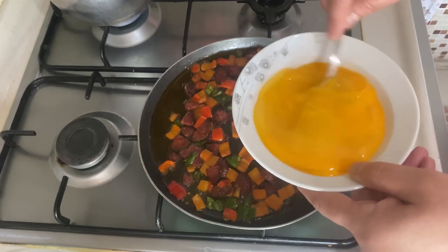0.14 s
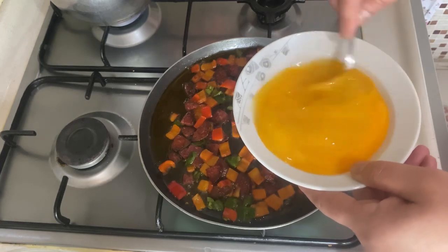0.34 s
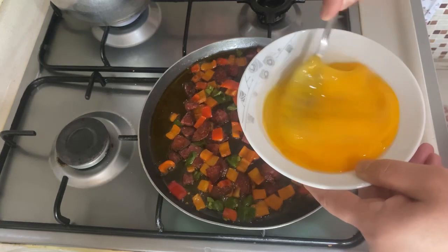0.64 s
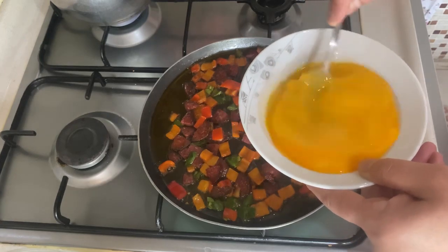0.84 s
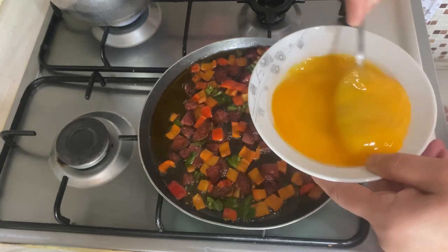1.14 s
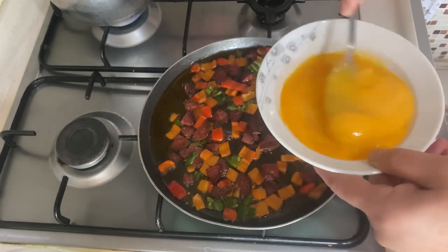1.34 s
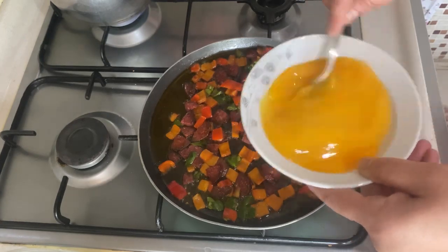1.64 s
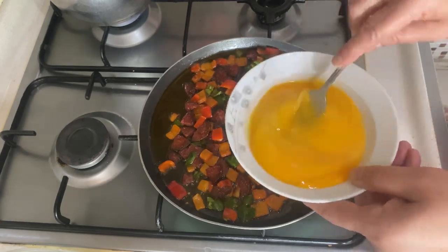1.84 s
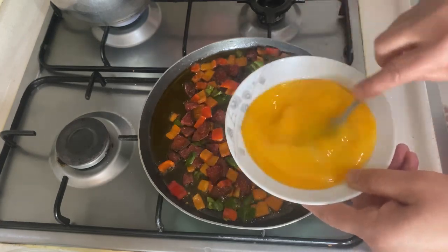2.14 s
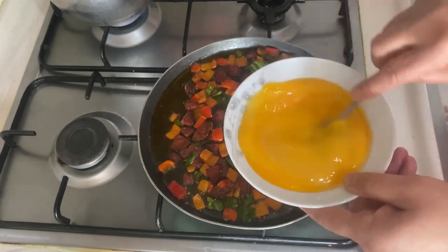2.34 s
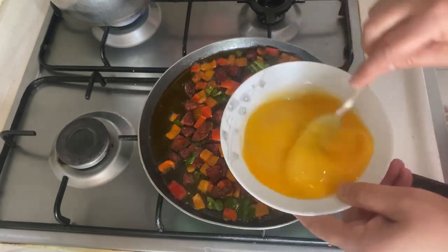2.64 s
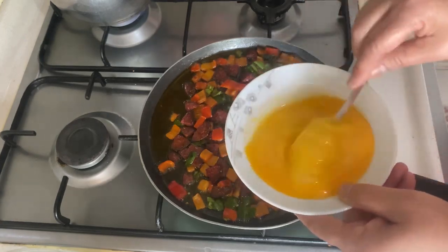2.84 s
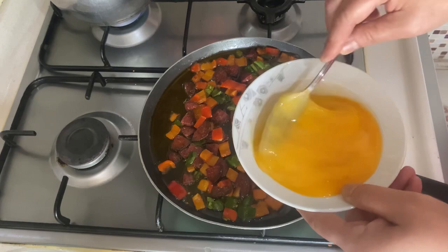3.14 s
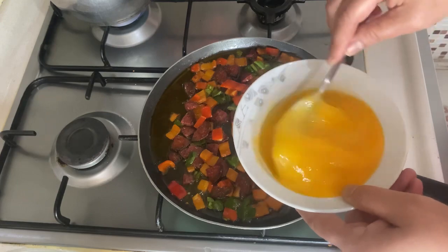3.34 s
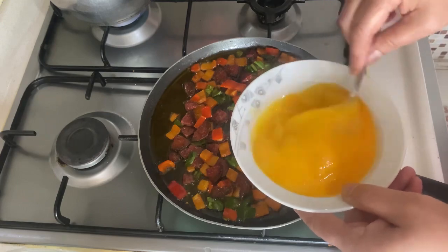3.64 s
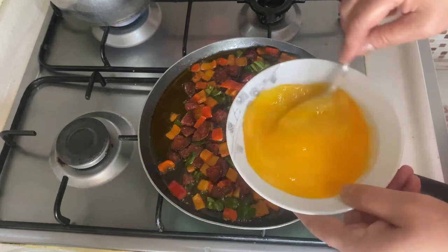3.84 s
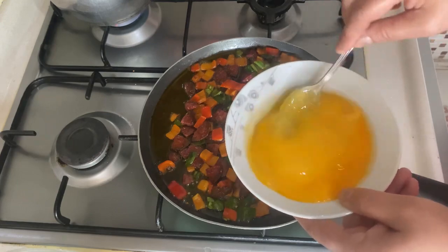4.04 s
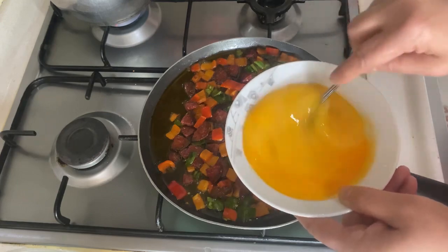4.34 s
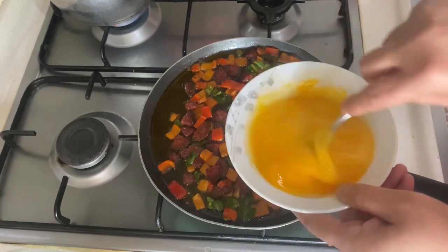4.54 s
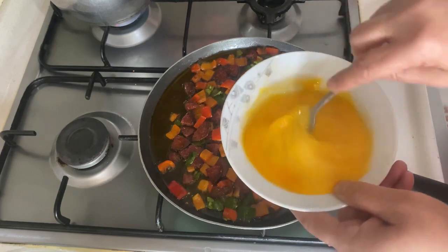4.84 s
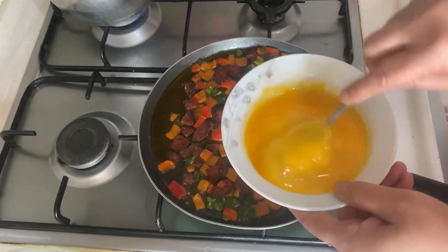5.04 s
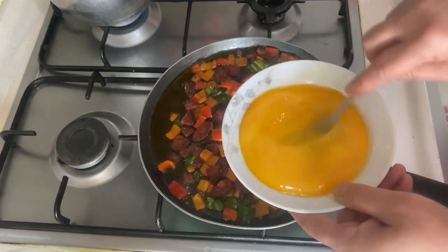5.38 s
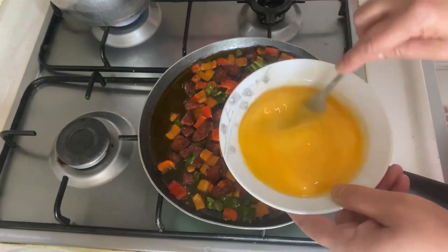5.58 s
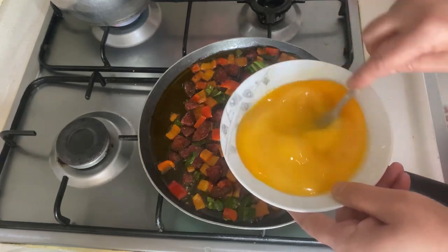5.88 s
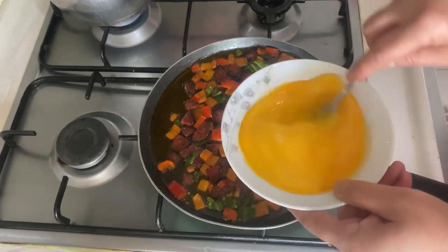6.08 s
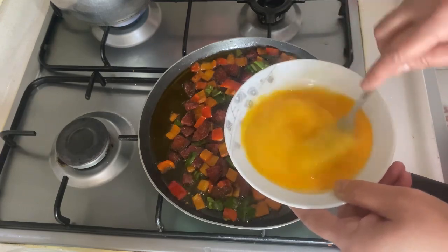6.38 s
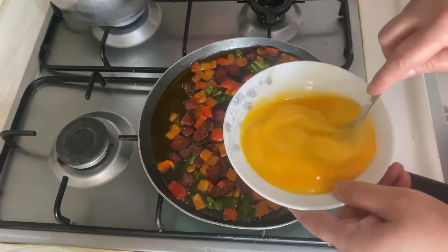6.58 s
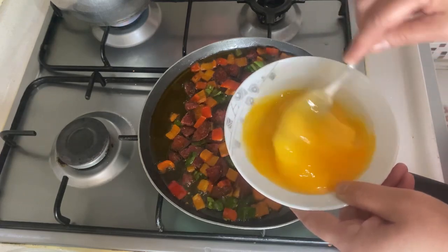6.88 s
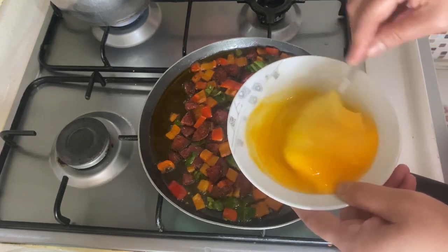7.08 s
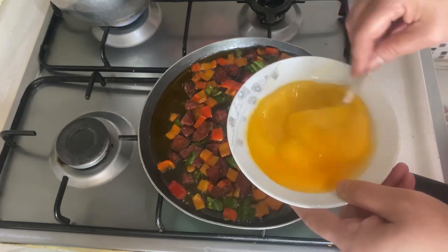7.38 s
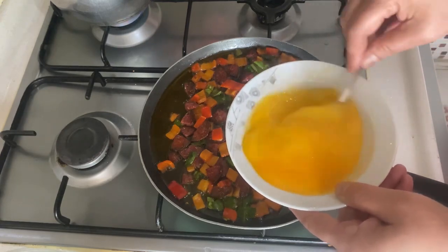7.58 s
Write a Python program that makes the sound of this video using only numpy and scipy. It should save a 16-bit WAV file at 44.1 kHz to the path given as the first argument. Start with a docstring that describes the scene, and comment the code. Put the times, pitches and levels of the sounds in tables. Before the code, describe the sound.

Quick metallic fork taps on a ceramic bowl whisk liquid egg, about five a second, above faint gas hiss and distant motor hum.

```python
"""Beating eggs by the hob

A small kitchen, taken in stereo: a fork beats eggs in a hand-held ceramic bowl over a gas hob.
Noisy contact forces ring resonances of bowl, tines and fork; gliding tones make air pockets plop,
and tiny resonant pops make froth. Tiles and hob answer with a short diffuse reverberation.
Behind lie a distant motor and drones (sines), low rumble and hob hiss (filtered noise)."""
import sys
import numpy as np
from scipy import signal
from scipy.fft import rfft, irfft
from scipy.io import wavfile

SR = 44100
rng = np.random.default_rng(int(sys.argv[2]) if len(sys.argv) > 2 else 0)


def log_audio(samples):
    """Write samples as a 16-bit WAV file to the path given in sys.argv[1]."""
    # one column per channel
    frames = np.atleast_2d(samples).T
    # limit to full scale, then quantise
    limited = np.clip(frames, -1, 1)
    pcm = np.round(limited * 32767).astype(np.int16)
    wavfile.write(sys.argv[1], SR, pcm)


N = 340260
TIME = np.arange(N) / SR

# Tine contacts on the bowl: t/s, tick level/dB, tick f/Hz, tine f/Hz,
# tine ring level/dB, fork overtone level/dB, bowl knock level/dB
CONTACTS = [(0.167, -40, 12700, 4480, -50, -54, -59), (0.298, -47, 12000, 4090, -56, -60, -58),
            (0.311, -57.5, 11800, 4250, -43, -65, -64.5), (0.3324, -42.5, 12800, 4150, -40, -45, -63),
            (0.366, -45.5, 12600, 4430, -53, -53, -65), (0.509, -52, 10700, 3780, -52, -55, -61),
            (0.527, -50, 11700, 4840, -50, -57, -71), (0.698, -32, 9300, 4560, -37.5, -39, -56.5),
            (0.8754, -33.5, 13600, 4480, -42.5, -42, -57), (1.056, -30, 13000, 4530, -41, -41, -53),
            (1.2462, -36.5, 10050, 4380, -52, -43, -59), (1.428, -31, 13400, 4510, -37.5, -38, -55),
            (1.636, -31.5, 13800, 4100, -42.5, -39, -58), (1.9699, -45.5, 13000, 4540, -47.5, -57, -64),
            (2.139, -47, 9800, 3460, -53.5, -52, -78), (2.7608, -31, 14200, 3970, -47, -42, -50.5),
            (2.814, -50, 10000, 4490, -46.5, -57, -69), (2.9858, -25.5, 13900, 4020, -26.5, -31, -33),
            (3.2058, -25.5, 10750, 4520, -30.5, -27, -31.5), (3.4117, -25.5, 12200, 4440, -37, -36, -35),
            (3.6086, -31.5, 12600, 4200, -32, -40, -42), (3.829, -31, 12900, 4690, -31, -40.5, -44.5),
            (4.083, -35, 12100, 3860, -49, -43, -49), (4.31, -51.5, 10000, 3330, -55.5, -68, -74),
            (4.4827, -46.5, 10600, 3720, -50, -63, -56.5), (4.7743, -37, 13100, 4660, -52.5, -49.5, -67),
            (4.8462, -31, 10300, 4570, -51.5, -44, -50.5), (4.99, -45.5, 12600, 3270, -54, -60, -80),
            (5.3864, -43, 12000, 4080, -57.5, -55, -77), (5.615, -48, 11100, 4970, -72, -59, -76),
            (5.8615, -40, 12500, 5010, -56, -49, -61), (6.05, -58, 11900, 3200, -55, -68, -55),
            (6.082, -49.5, 13800, 4100, -58, -61, -69), (6.301, -43.5, 11100, 5050, -58, -49.5, -66),
            (6.516, -41.5, 14000, 3830, -66, -45, -55), (6.9628, -25, 14100, 3080, -34, -37, -42),
            (7.174, -32.5, 11500, 4300, -38, -47.5, -39), (7.366, -31, 12200, 4300, -44, -48.5, -39.5),
            (7.401, -46, 10400, 4600, -50, -50, -53), (7.533, -51, 13600, 3660, -53, -47, -58),
            (7.5504, -32.5, 13700, 3250, -37, -40.5, -41), (7.711, -41.5, 9700, 3380, -46, -45.5, -45.5)]
# Air pockets in the egg: t/s, first f/Hz, last f/Hz, level/dB
AIR_POCKETS = [(0.0, 1740, 1850, -50), (0.164, 2470, 2260, -51.5), (0.181, 1850, 1570, -54.5),
               (0.297, 2480, 2440, -50), (0.318, 1530, 1400, -57), (0.364, 2420, 2290, -50),
               (0.548, 1680, 1850, -58), (0.854, 1270, 1400, -58), (0.896, 1500, 1490, -59.5),
               (1.081, 2280, 2110, -50), (1.312, 1470, 1370, -57), (1.468, 3470, 3520, -53.5),
               (1.478, 1720, 1700, -53), (1.555, 1360, 1410, -55), (1.692, 2100, 2220, -55.5),
               (3.065, 1445, 2640, -45), (3.411, 2244, 2200, -35), (3.822, 1340, 1536, -42),
               (4.085, 2410, 1990, -47), (4.318, 1800, 1654, -52), (4.538, 2380, 2320, -54),
               (4.774, 1690, 1980, -42), (4.849, 1850, 1710, -39), (4.85, 1644, 1275, -38.5),
               (7.155, 1440, 1380, -49.5), (7.368, 2260, 2330, -42.5)]
# Bowl modes, damped by hand and egg: f/Hz, width/Hz, level/dB
BOWL_MODES = [(285, 110, -11), (528, 113, 0.5), (971, 108, 4.5), (1400, 87, 5), (1577, 95, 3),
              (1733, 56, 8.5), (2083, 130, 1.5), (2480, 77, 1), (2690, 140, 0.5), (2920, 170, 1.5),
              (3500, 72, 1)]
# Tines of slightly different length: ratio to the tine pitch, width/Hz at TINE_FREE_HZ, level/dB
TINE_MODES = [(.9, 168, -8), (1.003, 70.4, 7.5), (1.06, 171, -7.5)]
# Upper resonances of the fork: f/Hz, width/Hz, level/dB
FORK_OVERTONES = [(6910, 290, 0.5), (7200, 263, 7.5), (7740, 370, -2)]
# Tine tips on the glaze: f/Hz, width/Hz, level/dB
TIP_MODES = [(10040, 810, 0), (11130, 350, -3.5), (12160, 320, -1.5), (14300, 780, -2.5)]
# Reverberation time of the kitchen: f/Hz, t60/s
KITCHEN_T60 = [(400, 0.9), (1500, 0.13), (4300, 0.25), (15000, 0.11)]
# Reverberation level of the kitchen: f/Hz, level/dB
KITCHEN_LEVEL = [(400, -8), (1500, -6.5), (4300, -3), (7000, -6.5), (15000, -10)]
# Swell and fade of the motor hum: t/s, level/dB
MOTOR_LEVEL = [(0.0, -62.5), (0.9, -54.5), (1.7, -61), (2.06, -44.5), (4.19, -51.5), (4.58, -42.5),
               (5.69, -63.5), (6.12, -44.5), (7.01, -58.5), (7.33, -41), (7.5, -54)]
# Motor slowing, then running steadily: t/s, f/Hz
MOTOR_PITCH = [(0, 140.8), (1.4, 138), (2.1, 113.1), (6.3, 112.6)]
# Lines of the motor hum: multiple of its pitch, relative level/dB
MOTOR_LINES = [(.5, -14.5), (1, -1)]
# Other low drones that swell and fade: t/s, length/s, f/Hz, level/dB
LOW_DRONES = [(1.45, 0.58, 95.1, -51), (5.8, 0.23, 55, -50), (6.5, 1.4, 180.8, -53.5),
              (7.3, 0.32, 90.8, -46)]
# Faint thin tone that comes and goes: t/s, length/s, f/Hz, level/dB
FAINT_TONES = [(2.2, 1.3, 1712, -67)]
# Spectrum of the low rumble: f/Hz, relative level/dB
RUMBLE_SPECTRUM = [(24, -41), (40, -14.5), (56, 1.5), (72, -7.5), (92, 1), (140, -7), (180, -5), (220, -19),
                   (270, -11.5), (450, -24.5)]
# Level of the upper rumble: t/s, level/dB
UPPER_RUMBLE_LEVEL = [(0, -56.5), (2.8, -57.5), (5.8, -56), (7.25, -51.5), (7.72, -52)]
# Spectrum of the hob hiss: f/Hz, relative level/dB
HISS_SPECTRUM = [(250, 6.5), (500, 5), (900, 4), (1300, 0.5), (1750, 2.5), (2300, 0), (3200, -3), (4500, 1),
                 (6200, 2), (8500, 0), (13000, -1.5), (15500, -6.5)]
# Left-right likeness of the background noise: f/Hz, correlation
STEREO_LIKENESS = [(60, 1), (150, 0.9), (300, 0.65), (600, 0), (16000, 0.16)]
# Lag of the left microphone port: f/Hz, lag/rad (negative is early)
LEFT_PORT_LAG = [(2200, 0), (5800, -0.9), (7300, 1.5), (8300, 1.48), (9400, 3.5), (10400, 5), (13400, 9),
                 (15500, 14)]

# contact length at LIGHT_DB of tick level; it doubles for every CONTACT_DOUBLES_DB above that
CONTACT_S, CONTACT_DOUBLES_DB, LIGHT_DB = 0.0039, 68, -49
CLICK_DB = -57.5   # dry click of a light touch at LIGHT_DB
BOWL_RATTLE_DB = 0.5   # rattle on the bowl, relative to the single knock of the landing
# dipped deeper, the tines sound lower; their width grows with this power of the drop
TINE_FREE_HZ, EGG_DAMPING = 4760, 4.2
DEEP_DB, DEEP_DB_PER_S = -58, 1.28   # deep rumble: starting level and steady growth
HISS_DB, FLICKER_DB, FLICKER_PER_S = -51, 1.5, 260   # hob hiss with a slight quick flicker in level
CUTOFF_HZ = 16100


def clinks(tine_spread_db=-12, spread_db_per_octave=14, tick_width_hz=800, tick_focus_db=4.5, crack_db=-21):
    """Each contact sets bowl and fork ringing; the tine pitch shifts with grip and depth in the egg."""
    out, t = np.zeros((2, N)), np.arange(SR // 12) / SR
    for s, tick_db, tick_hz, tine_hz, tine_db, overtone_db, bowl_db in CONTACTS:
        contact = CONTACT_S * 2 ** ((tick_db - LIGHT_DB) / CONTACT_DOUBLES_DB)
        force = chatter(t, contact)

        landing = t == 0
        knock = landing + from_db(BOWL_RATTLE_DB) * force / np.linalg.norm(force[0])
        bowl = burst(resonate(knock, struck(BOWL_MODES, detune=0.0082)), bowl_db)

        drop = TINE_FREE_HZ / tine_hz
        modes = [(ratio * tine_hz, width * drop ** EGG_DAMPING, db) for ratio, width, db in TINE_MODES]
        clatter_db = tine_spread_db + spread_db_per_octave * np.log2(drop)
        clatter = resonate(force, [(4300, 1200, clatter_db)])
        tine = burst(butter(resonate(force, modes) + clatter, 3200, "high"), tine_db)

        ringing = resonate(force, struck(FORK_OVERTONES))
        overtone = burst(butter(ringing, 3400, "high"), overtone_db)

        # the tips rasp on the glaze, brightest at a pitch set by the angle of the fork
        rasp = chatter(t, contact)
        focus = resonate(rasp, [(tick_hz, tick_width_hz, tick_focus_db)])
        tick = resonate(force, struck(TIP_MODES)) + focus + from_db(crack_db) * rasp
        tick = burst(butter(tick, [9600, 16400], "band", order=3), tick_db)

        # every touch, however light, starts with a dry broad click
        click = butter(chatter(t, contact / 2), [1600, 7500], "band")
        click = burst(click, CLICK_DB + .5 * (tick_db - LIGHT_DB))
        add(out, s, bowl + tine + overtone + tick + click)
    return out


def chatter(t, contact, first=6.4, first_s=0.00011, rebound=0.15, settle=0.67, apart=0.99):
    """The tines land hard, skid in a dense rattle for the length of the contact, then rebound lightly."""
    landing = first * np.exp(-t / first_s)
    skid = np.exp(-(t / (1.7 * contact)) ** 3)
    force = landing + skid + rebound * np.exp(-settle * t / contact)
    # uneven slips common to both channels, plus noise of each channel's own
    slips = rng.standard_normal(len(t)) * from_db(5.8 * rng.standard_normal(len(t)))
    return force * (slips + apart * rng.standard_normal((2, len(t))))


def struck(modes, spread_db=3.14, detune=0.021):
    """Each contact lands elsewhere, so every mode gets a strength and a slight detuning of its own."""
    chance = rng.standard_normal((len(modes), 2))
    return [(hz * (1 + detune * a), width, db + spread_db * b)
            for (hz, width, db), (a, b) in zip(modes, chance)]


def plops(decay_s=0.0078, rise_s=0.0015, glide_s=0.0092, wet=0.45):
    """An air pocket rings briefly, gliding in pitch as it opens or the egg closes over it."""
    out, t = np.zeros((2, N)), np.arange(SR // 12) / SR
    for s, first_hz, last_hz, db in AIR_POCKETS:
        pitch = last_hz + (first_hz - last_hz) * np.exp(-t / glide_s)
        tone = np.sin(2 * np.pi * np.cumsum(pitch) / SR)
        squelch = rms_one(resonate(rng.standard_normal((2, len(t))), [(first_hz, 700, 0)]))
        swell = (1 - np.exp(-t / rise_s)) * np.exp(-t / decay_s)
        add(out, s, burst(swell * (tone + wet * squelch), db))
    return out


def froth(per_s=240, size_db=9.0, cycles=30, lag_s=.022, between=.5, level_db=-66, fade_db_per_s=1.0):
    """Small bubbles blip in the egg, most densely in the wake of each stroke, fainter as the egg thins."""
    coarse = TIME[::50]
    s, *_, bowl_db = np.transpose(CONTACTS)
    since = np.maximum(coarse[:, None] - s, 0) / lag_s
    firmness = np.minimum(from_db(.5 * (bowl_db + 53.0)), 1)
    wake = np.max(firmness * since * np.exp(1 - since), axis=1)
    stirring = between + np.interp(TIME, coarse, wake)
    out, pitches = 0, np.geomspace(1200, 3800, 14)
    for hz in pitches:
        born = rng.random(N) < per_s * stirring / len(pitches) / SR
        size = from_db(size_db * np.minimum(rng.exponential(1, N), 2))
        pops = born * stirring * size + 1e-18
        # ringing twice rounds the onset of each bubble
        bubble = [(hz, hz / cycles * 2, 0)]
        side_gains = rng.normal(1, 1.0, (2, 1))
        out = out + side_gains * resonate(resonate(pops, bubble), bubble) / np.sqrt(hz)
    return from_db(level_db) * rms_one(out * from_db(-fade_db_per_s * TIME))


def kitchen(x, build_s=0.004):
    """Diffuse reflections from tiles and hob build up quickly and die away band by band."""
    t, response = np.arange(SR // 2) / SR, 0
    edges = np.geomspace(250, 18000, 11)
    for low, high in zip(edges, edges[1:]):
        hz = np.sqrt(low * high)
        decay = from_db(-60 * t / max(at_hz(KITCHEN_T60, hz), .02))
        tail = (1 - np.exp(-(t / build_s) ** 2)) * decay
        noise = butter(rng.standard_normal((2, len(t))), [low, high], "band")
        response = response + from_db(at_hz(KITCHEN_LEVEL, hz)) * noise * tail / np.sqrt(np.sum(tail ** 2))
    return signal.fftconvolve(x, response, axes=1)[:, :N]


def hob_hiss():
    """The gas hob hisses: coloured noise with a slow drift and a slight quick flicker in level."""
    level_db = HISS_DB + 0.5 * drift(2.85) + FLICKER_DB * drift(FLICKER_PER_S)
    return from_db(level_db) * stereo_noise(HISS_SPECTRUM)


def motor_hum(waver_db=2.0, wander=0.22):
    """A distant motor slows to a steady speed; its lines waver in level and phase."""
    level_db, = in_time(MOTOR_LEVEL)
    hz, = in_time(MOTOR_PITCH)
    phase = 2 * np.pi * np.cumsum(hz) / SR
    out = 0
    for ratio, db in MOTOR_LINES:
        gain = from_db(db + waver_db * drift(7.6)) * np.sqrt(2)
        out = out + gain * np.sin(ratio * phase + wander * drift(4.8))
    return from_db(level_db) * out


def swells(rows, wander):
    """Tones fade in and out along half a sine, wandering in phase."""
    out = 0
    for s, length, hz, db in rows:
        fade = np.sin(np.pi * np.clip((TIME - s) / length, 0, 1))
        tone = np.sqrt(2) * np.sin(2 * np.pi * hz * TIME + wander * drift(30))
        out = out + from_db(db) * fade * tone
    return out


def rumble(split_hz=120):
    """Dull low noise: the deep part grows steadily while the upper part swells on its own."""
    deep_db = DEEP_DB + DEEP_DB_PER_S * TIME
    upper_db, = in_time(UPPER_RUMBLE_LEVEL)
    deep = rms_one(butter(stereo_noise(RUMBLE_SPECTRUM), split_hz, "low", order=4))
    upper = rms_one(butter(stereo_noise(RUMBLE_SPECTRUM), [split_hz, 480], "band", order=4))
    return from_db(deep_db) * deep + from_db(upper_db) * upper


def stereo_noise(spectrum):
    """Coloured noise, alike on both sides in the bass; rms 1."""
    hz = np.fft.rfftfreq(N, 1 / SR)
    mid, side = rfft(rng.standard_normal((2, N)))
    alike = np.clip(at_hz(STEREO_LIKENESS, hz), -1, 1)
    both = np.sqrt(1 + alike) * mid + np.sqrt(1 - alike) * side * [[1], [-1]]
    return rms_one(irfft(from_db(at_hz(spectrum, hz)) * both, N))


def resonate(x, modes):
    """Parallel two-pole resonances (f/Hz, width/Hz, level/dB) with alternating signs."""
    out = 0
    for k, (hz, width, db) in enumerate(modes):
        r = np.exp(-np.pi * width / SR)
        poles = [1, -2 * r * np.cos(2 * np.pi * hz / SR), r * r]
        gain = (-1) ** k * from_db(db) * (1 - r * r) / 2
        out = out + gain * signal.lfilter([1, 0, -1], poles, x)
    return out


def burst(x, db):
    """Give a short sound the energy of 20 ms at this level."""
    return from_db(db) * x / np.sqrt(np.mean(np.sum(x ** 2, axis=-1)) / (.02 * SR) + 1e-20)


def add(track, s, sound):
    """Mix a sound in at a time."""
    start = max(round(s * SR), 0)
    track[:, start:start + sound.shape[-1]] += sound[..., :max(N - start, 0)]


def butter(x, hz, kind, order=2):
    """Causal Butterworth filter."""
    return signal.sosfilt(signal.butter(order, np.clip(hz, 10, .45 * SR), kind, fs=SR, output="sos"), x)


def drift(rate):
    """Random knots of spread 1, this many a second, joined by straight lines."""
    knots = rng.standard_normal(int(N / SR * rate) + 2)
    return np.interp(TIME * rate, np.arange(len(knots)), knots)


def in_time(rows):
    """One curve per column, joined by straight lines."""
    s, *columns = np.transpose(rows)
    return [np.interp(TIME, s, c) for c in columns]


def at_hz(points, hz):
    """Read a table on a log-frequency axis."""
    table_hz, values = np.transpose(points)
    return np.interp(np.log(hz + 1e-9), np.log(table_hz), values)


def from_db(db):
    """Decibels to gain."""
    return 10 ** (np.asarray(db) / 20)


def rms_one(x):
    """Scale to unit rms."""
    return x / np.sqrt(np.mean(x ** 2) + 1e-20)


def scene():
    """Fork, bowl and egg in the kitchen, over hiss, hum, drones and rumble."""
    beating = clinks() + plops() + froth()
    low = motor_hum() + swells(LOW_DRONES, wander=0.69) + rumble()
    low = low * from_db([[.5], [-.5]])   # slightly stronger on the left
    return beating + kitchen(beating) + low + hob_hiss() + swells(FAINT_TONES, wander=0.82)


def record(dry, merge_hz=7500, ceiling=0.32):
    """The two microphone ports merge in the treble with a lag; peaks are rounded and the top is cut."""
    hz = np.fft.rfftfreq(N, 1 / SR)
    left, right = rfft(dry)
    merged = .995 / (1 + np.exp(-(hz - merge_hz) / 400))
    left = np.sqrt(1 - merged) * left + merged * right
    left = left * np.exp(-1j * at_hz(LEFT_PORT_LAG, hz))
    both = irfft(np.array([left, right]), N)
    both = ceiling * np.tanh(both / ceiling)
    return signal.sosfilt(signal.ellip(10, .2, 70, CUTOFF_HZ, fs=SR, output="sos"), both)


dry = scene()
out = record(dry)
log_audio(out)
```